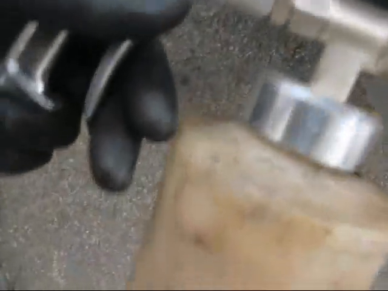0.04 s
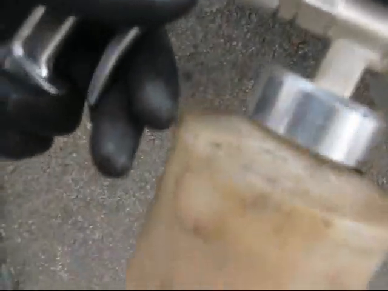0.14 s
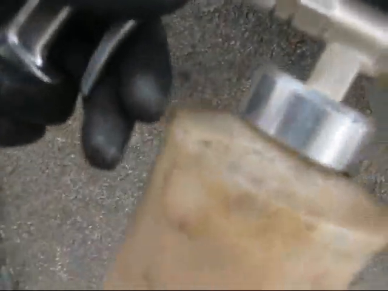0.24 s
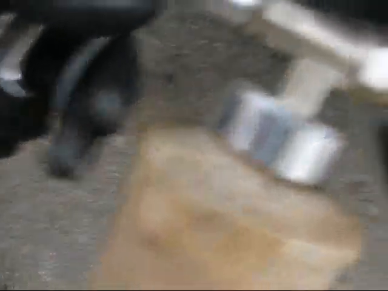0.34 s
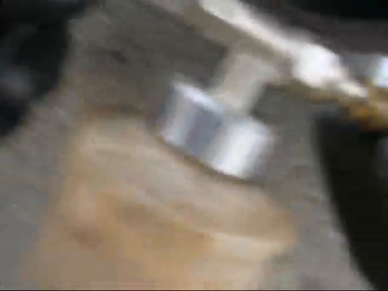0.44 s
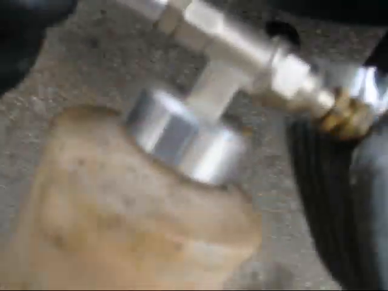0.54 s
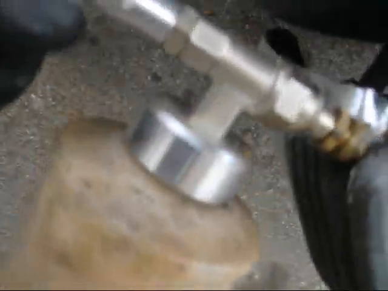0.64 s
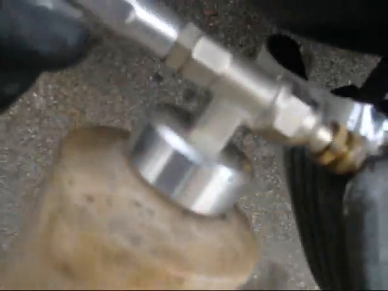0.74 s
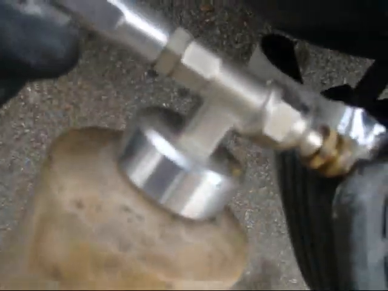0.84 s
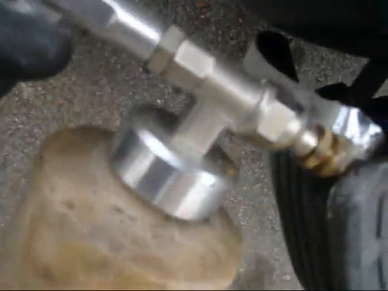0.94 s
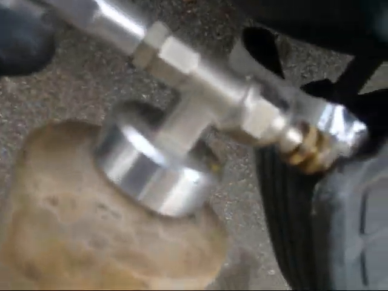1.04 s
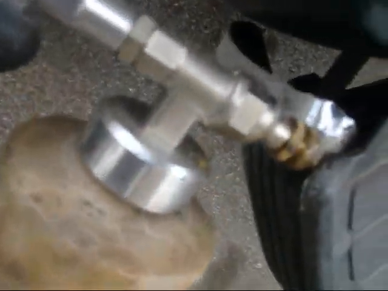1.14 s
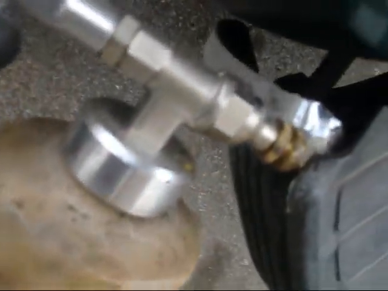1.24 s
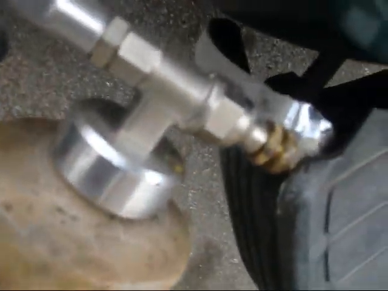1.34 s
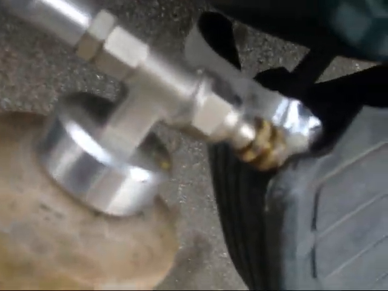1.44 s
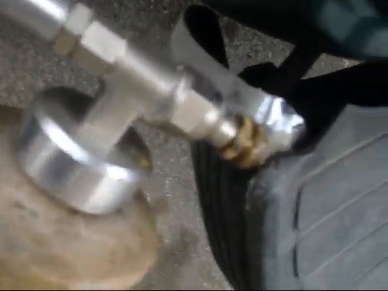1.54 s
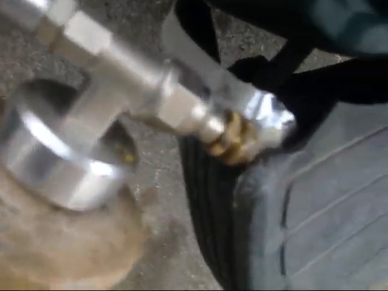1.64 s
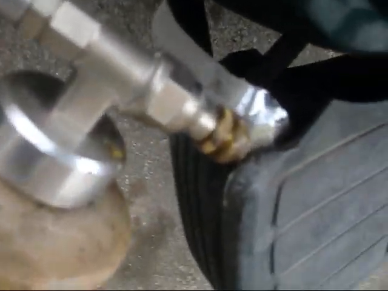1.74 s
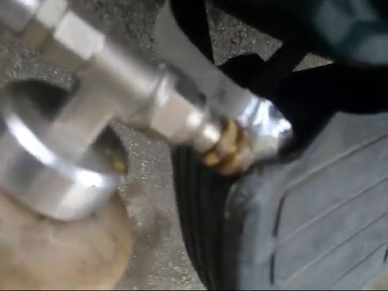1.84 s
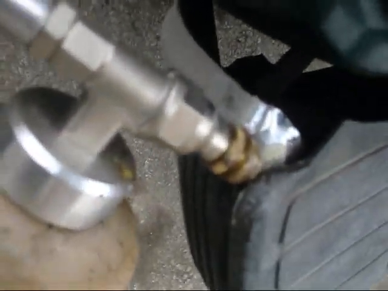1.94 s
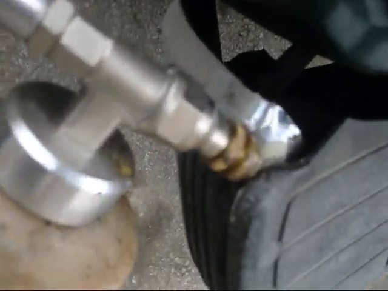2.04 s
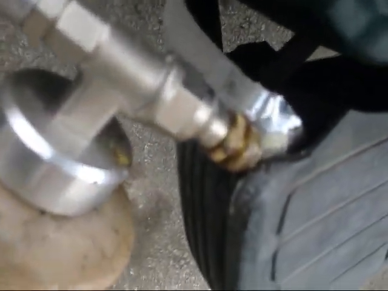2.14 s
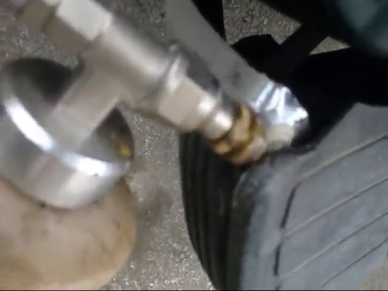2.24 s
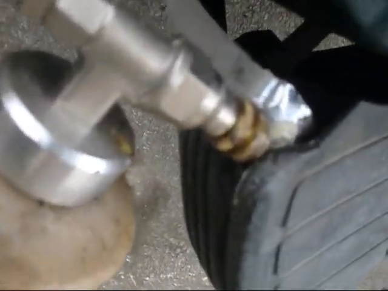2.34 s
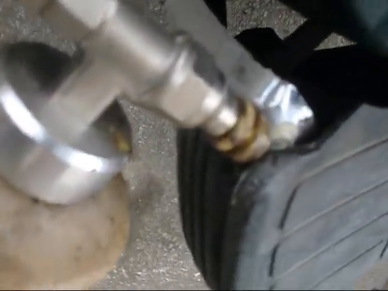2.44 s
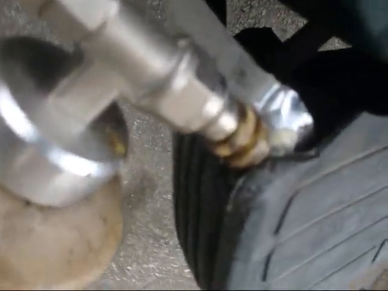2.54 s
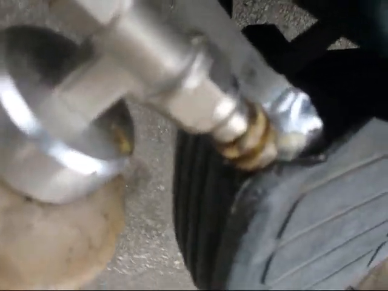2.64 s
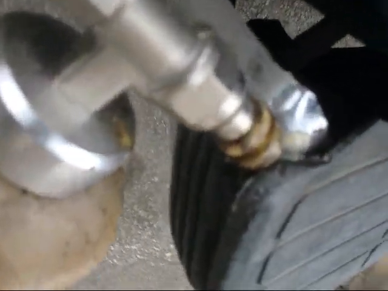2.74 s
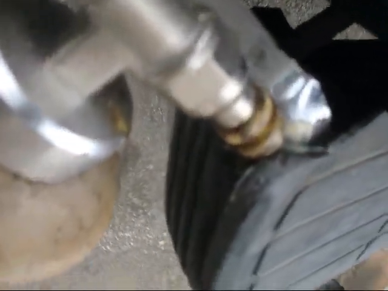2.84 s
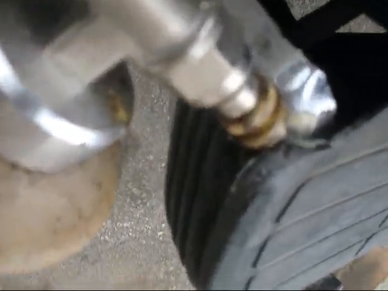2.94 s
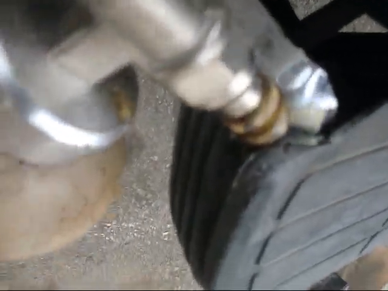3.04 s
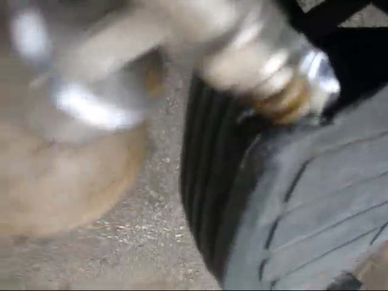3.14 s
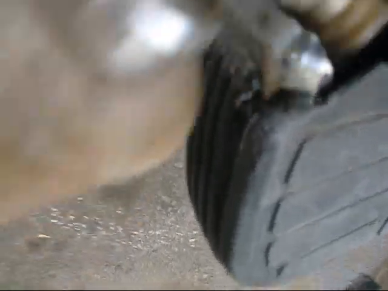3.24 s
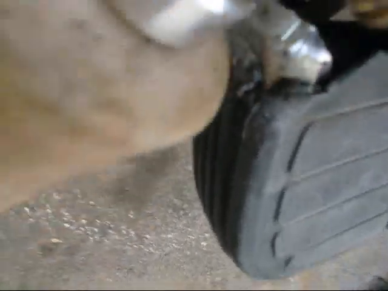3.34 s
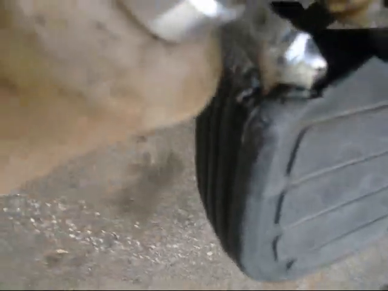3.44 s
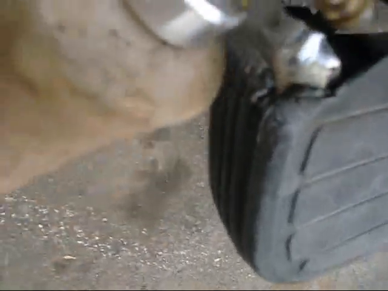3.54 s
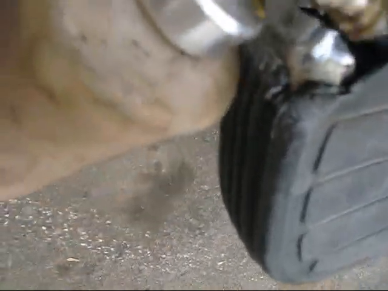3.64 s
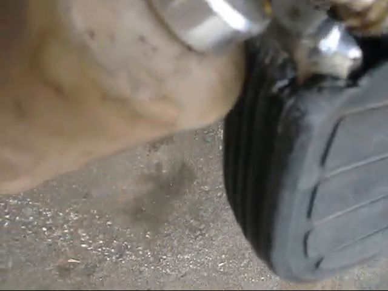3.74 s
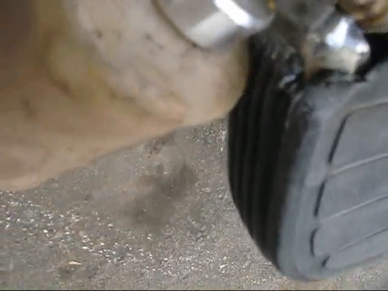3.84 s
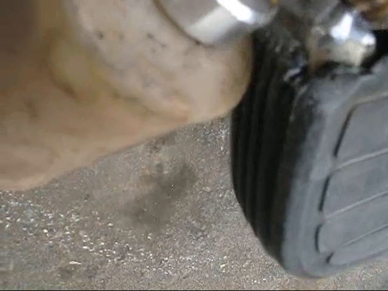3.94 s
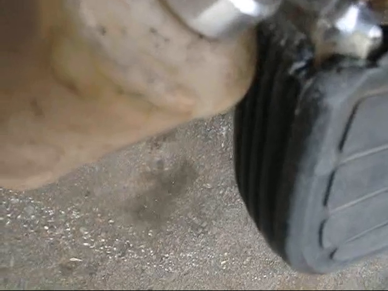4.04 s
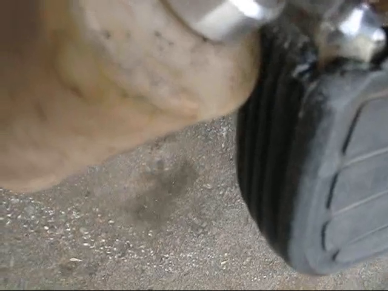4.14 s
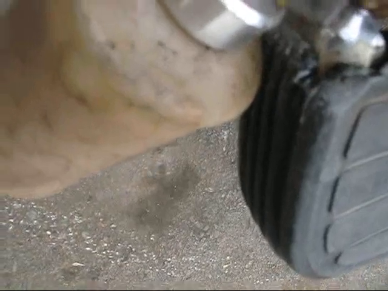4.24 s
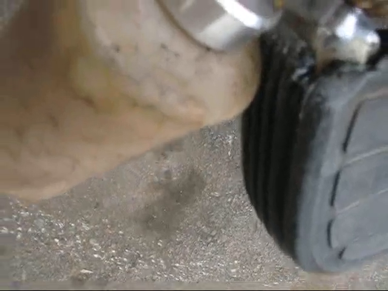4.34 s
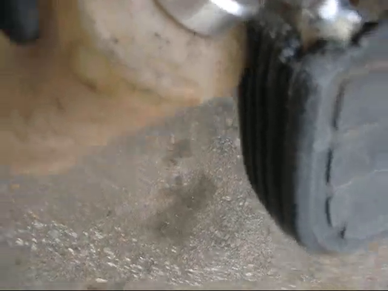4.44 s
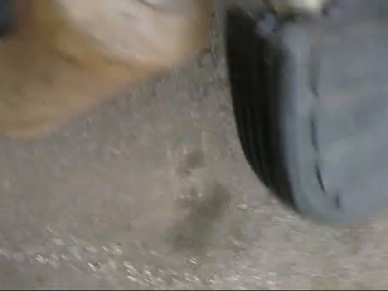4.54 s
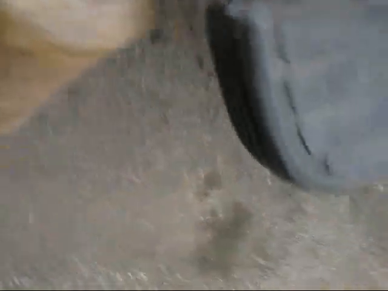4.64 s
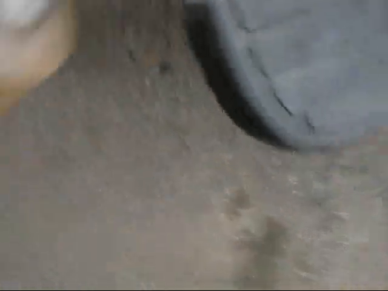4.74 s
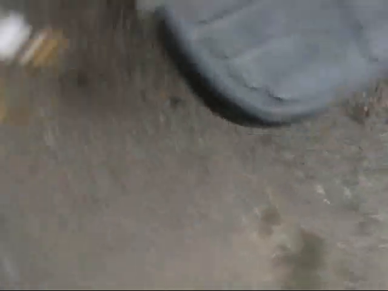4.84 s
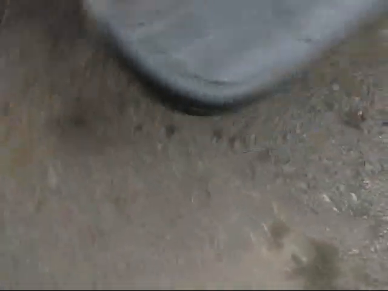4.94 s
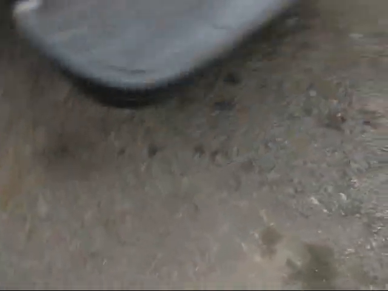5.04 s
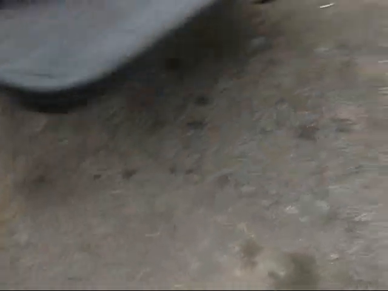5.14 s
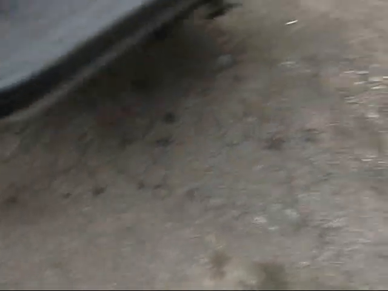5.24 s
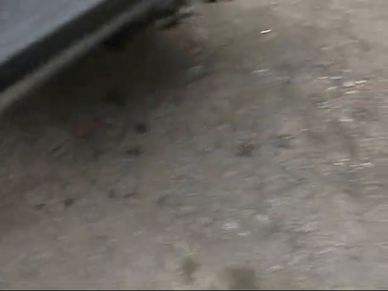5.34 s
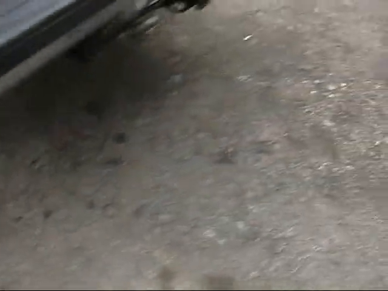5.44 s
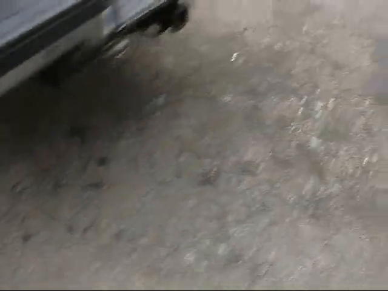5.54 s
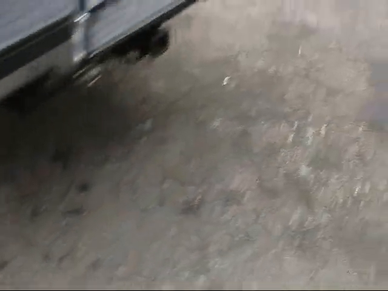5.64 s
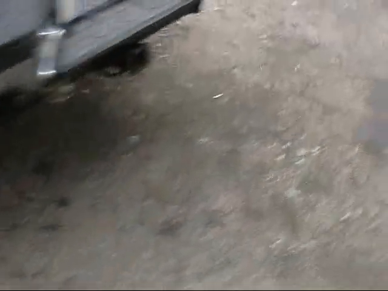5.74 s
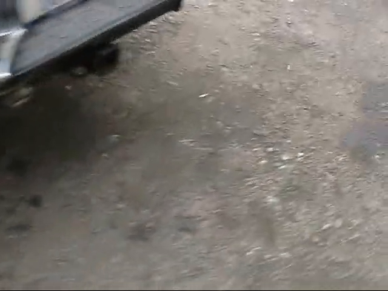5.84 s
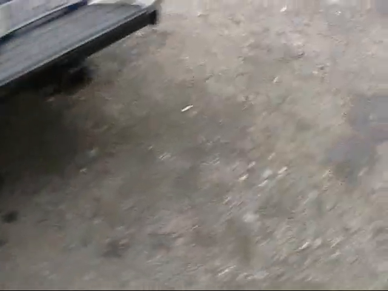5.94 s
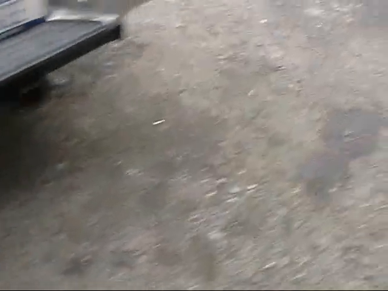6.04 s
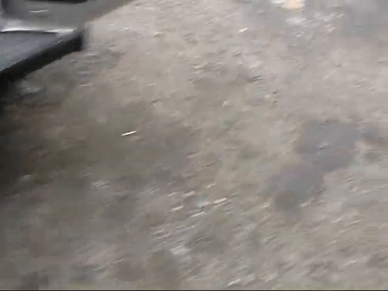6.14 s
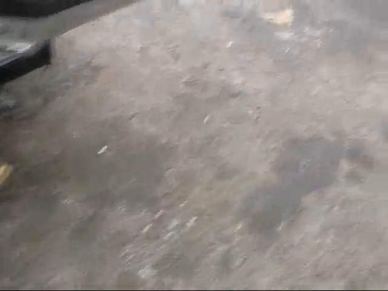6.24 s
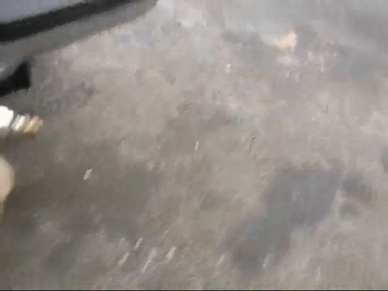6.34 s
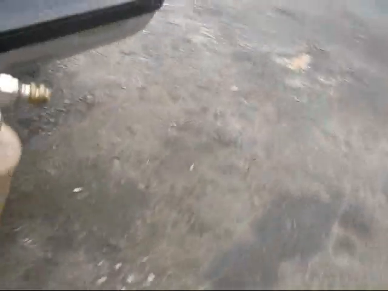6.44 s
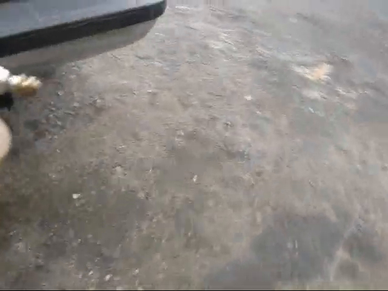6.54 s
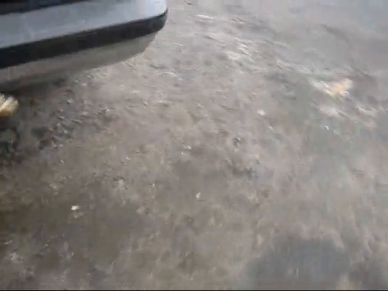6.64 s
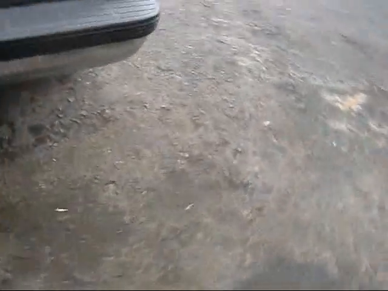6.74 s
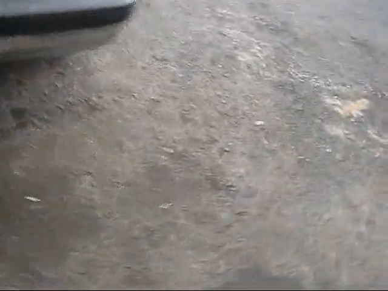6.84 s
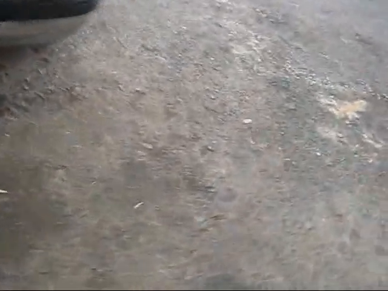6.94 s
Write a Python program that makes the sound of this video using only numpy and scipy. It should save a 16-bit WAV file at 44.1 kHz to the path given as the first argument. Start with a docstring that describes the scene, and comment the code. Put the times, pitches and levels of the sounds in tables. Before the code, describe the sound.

Thin airy leak and small rustles come first, then a very loud, dense air blast lasting about two and a half seconds. A brief gap of leaking hiss follows, then a one-second blast with a hollow, ringing colour. Each starts with a whistling puff and stops abruptly. The rest is quiet: distant rumble and whine, handling bumps, a stuttering scrape and low buffeting, caught by a slightly overloaded mono camera microphone.

```python
"""A compressed-air spray gun fires two bursts close to a hand-held mono camera: shaped turbulence noise, gated
by a valve that whistles as it opens, with low pressure puffs and a short hiss of trapped air after each shut-off.
Its coupling leaks a thin filtered-noise hiss throughout, over a yard and a distant machine's rumble, hum and whine.
Handling adds band-noise rustles, low buffeting, damped ringing knocks and a scrape made of small slips.
The microphone saturates softly and the camera's gain control ducks under the blasts."""
import sys
import numpy as np
from scipy import signal
from scipy.io import wavfile
from scipy.ndimage import uniform_filter1d

SR = 44100
rng = np.random.default_rng(int(sys.argv[2]) if len(sys.argv) > 2 else 0)


def wav_out(sig):
    """Save sig, one row per channel (or a flat mono array), as 16-bit PCM at SR to the path in sys.argv[1]."""
    wavfile.write(sys.argv[1], SR, np.round(np.clip(np.atleast_2d(sig).T, -1, 1) * 32767).astype(np.int16))


N = 308189

# leak and yard loudness as the camera moves, rms before gain control: start_s [s], leak_db [dB], yard_db [dB]
AROUND_LEVELS = [(0.0, -32.5, -47), (0.15, -27.5, -40.5), (0.56, -28, -45), (3.24, -37, -45),
                 (4.83, -39, -44), (5.54, -49, -51), (5.98, -47, -48.5), (6.35, -37, -46.5),
                 (6.65, -38, -46), (6.99, -37, -47)]


def gain_of(db):
    """Turns decibels into an amplitude factor."""
    return 10 ** (np.asarray(db) / 20)


def evened(x):
    """Scales to rms 1."""
    return x / np.sqrt(np.mean(x ** 2) + 1e-20)


def read(points, hz):
    """Reads a spectrum in dB by straight lines on a log-frequency axis."""
    f, value = np.transpose(points)
    return np.interp(np.log(hz + 1), np.log(f + 1), value)


def add(mix, s, sound):
    """Mixes a sound in at s seconds, cutting off what runs past the end."""
    part = mix[round(s * SR):][:len(sound)]
    part += sound[:len(part)]


def resonate(x, hz, width):
    """One complex-pole resonance with a gain near 1 at its peak."""
    r = np.exp(-np.pi * width / SR)
    pole = r * np.exp(2j * np.pi * hz / SR)
    return 2 * signal.lfilter([1 - r], [1, -pole], x).real


def ring(x, hz, width):
    """Two equal resonances in a row for steeper skirts, scaled to rms 1."""
    return evened(resonate(resonate(x, hz, width), hz, width))


def bump(hz, centre, octaves):
    """A bell of height 1 on the log-frequency axis."""
    return np.exp(-.5 * (np.log2((hz + 1) / centre) / octaves) ** 2)


def swell(length, hz, width, db, rise):
    """Band noise that rises and dies away; rise is the fraction of the length spent rising."""
    u = np.linspace(0, 1, round(length * SR))
    rise = np.clip(rise, .05, .9)
    shape = np.sin(.5 * np.pi * np.minimum(u / rise, (1 - u) / (1 - rise))) ** 2
    settled = ring(rng.standard_normal(len(u) + 500), hz, width)[500:]  # skips the filter's start-up
    return gain_of(db) * settled * shape


def turbulence(count, colour, patchy_db, flicker_db):
    """Noise from random short-time spectra with drifting patches and a shared flicker; colour(hz, s) gives dB."""
    frames = count // 256 + 5
    hz = np.fft.rfftfreq(1024, 1 / SR)[:, None]
    at = np.arange(frames) * 256 / SR
    real, imaginary, patches = rng.standard_normal((frames, 513, 3)).T
    patches = uniform_filter1d(patches, size=14, axis=0)  # smooth across frequency, then time
    patches = evened(uniform_filter1d(patches, size=12, axis=1))
    flicker = evened(uniform_filter1d(rng.standard_normal(frames), size=6))
    level_db = colour(hz, at) + patchy_db * patches + flicker_db * flicker
    spectra = (real + 1j * imaginary) * gain_of(level_db)
    return evened(signal.istft(spectra, nperseg=1024, noverlap=768)[1][:count])


def machine_rumble():
    """Distant machine: broad low noise plus narrow noise resonances that hum."""
    # rumble colour: pitch_hz [Hz], density_db [dB per Hz, relative]
    rumble_colour = [(12, -43), (25, -13.5), (45, -11.5), (80, -9), (110, -7.5), (162, -14), (220, -11.5),
                     (600, -23), (780, -47.5), (1320, -120)]
    # hum resonances: pitch_hz [Hz], width_hz [Hz, of each of two in a row], level_db [dB re rumble]
    hum_tones = [(65.8, 5.5, -13), (99, 4.5, -8.5), (139.7, 6.3, -9.5), (201, 13, -8)]
    rumble_db = -47.5
    low = turbulence(N, lambda hz, at: read(rumble_colour, hz), patchy_db=1.0, flicker_db=1.5)
    hum = sum(gain_of(db) * ring(rng.standard_normal(N), hz, width) for hz, width, db in hum_tones)
    return gain_of(rumble_db) * (low + hum)


def machine_whine():
    """Distant machine: a sine of wavering pitch inside a fuzz of narrow noise, swelling and fading."""
    # one tone: pitch_hz [Hz], fuzz_width_hz [Hz, of each of two resonances], fuzz [factor, rms re tone]
    whine_tone = (1430, 150, 1.2)
    # swells and fades: start_s [s], level_db [dB]
    whine_level = [(0, -46.5), (.56, -46.5), (3.3, -51), (4.72, -48), (4.8, -47), (4.93, -52), (5.0, -42),
                   (5.07, -45), (5.11, -54), (5.9, -62), (6.99, -63)]
    pitch, width, fuzz = whine_tone
    waver_hz = 18.1 * evened(uniform_filter1d(rng.standard_normal(N), size=1500))
    sine = np.sqrt(2) * np.sin(2 * np.pi * np.cumsum(pitch + waver_hz) / SR)
    tone = sine + fuzz * ring(rng.standard_normal(N), pitch, width)
    level_db = np.interp(np.arange(N) / SR, *np.transpose(whine_level))
    return gain_of(level_db) * evened(tone)


def yard_wash():
    """The yard: a mid-range wash of patchy noise whose level follows the camera."""
    # wash colour: pitch_hz [Hz], density_db [dB per Hz, relative]
    yard_colour = [(180, -30), (300, -15), (629, -7), (819, -6.5), (1150, -7), (1260, -6), (1420, -6.5),
                   (2240, -14), (2980, -12), (4200, -19), (5460, -56.5), (9240, -120)]
    wash = turbulence(N, lambda hz, at: read(yard_colour, hz), patchy_db=1.5, flicker_db=1.5)
    start_s, _, yard_db = np.transpose(AROUND_LEVELS)
    return gain_of(np.interp(np.arange(N) / SR, start_s, yard_db)) * wash


def coupling_leak():
    """Thin hiss of air through a small gap; its colour depends on where the camera stands."""
    # three leak colours, each: pitch_hz [Hz], density_db [dB per Hz, relative]
    close_by = [(1290, -28), (2200, -15), (2980, -10), (3560, -13.5), (3960, -10), (4370, -13.5),
                (5190, -10.5), (7250, -11.5), (8400, -6), (10600, -2.5), (12400, -3.5), (14600, -16),
                (15500, -23)]
    behind_bumper = [(1290, -54), (2200, -23.5), (2630, -5), (3100, -6), (3420, -21), (4160, -11),
                     (5100, -7.5), (7250, -9.5), (7490, -8), (9190, -7.5), (10100, -2.5), (11100, -3),
                     (15500, -15.5)]
    step_away = [(1290, -42.5), (2200, -20.5), (2930, -6.5), (3150, -6), (3500, -16.5), (5060, -7),
                 (6360, -13), (7800, -6), (9420, -7.5), (10300, 0), (10900, -0.5), (14800, -12),
                 (15500, -18)]
    step_back_s, swing_s, swing_length_s = 2.3, 5.44, 0.67  # drops behind the bumper, later swings round
    echo_s, echo_drift, echo_db = .00095, -.00018, 0.3  # delay off the bumper, its drift in s per s, comb depth

    def colour(hz, at):
        """The leak's spectrum at the camera, combed by the bumper's reflection while close."""
        turned = np.clip((at - swing_s) / swing_length_s, 0, 1)
        later = (1 - turned) * read(behind_bumper, hz) + turned * read(step_away, hz)
        comb = echo_db * np.cos(2 * np.pi * hz * (echo_s + echo_drift * at))
        return np.where(at < step_back_s, read(close_by, hz) + comb, later)

    hiss = turbulence(N, colour, patchy_db=1.2, flicker_db=1.0)
    start_s, leak_db, _ = np.transpose(AROUND_LEVELS)
    return gain_of(np.interp(np.arange(N) / SR, start_s, leak_db)) * hiss


def add_rustles_and_buffeting(mix):
    """Rustles and rubbing, short swells of band noise, plus longer low buffeting as the camera swings."""
    # start_s [s], length_s [s], pitch_hz [Hz], width_hz [Hz, of each of two resonances], level_db [dB];
    # the long rows below 100 Hz are the buffeting
    noise_swells = [(0.113, 0.049, 2500, 2500, -40), (.265, 0.046, 3000, 3500, -35.5),
                    (4.6, 0.3, 1900, 300, -41.5), (4.679, 0.19, 2700, 900, -40),
                    (4.739, 0.013, 3500, 2500, -31), (4.753, 0.03, 3380, 900, -28.5),
                    (4.746, 0.033, 7000, 6000, -30.5), (5.191, .05, 1800, 2000, -46),
                    (6.418, .05, 1100, 1200, -41.5), (6.098, 0.85, 60, 90, -48), (6.7, 0.33, 85, 40, -45)]
    for start_s, *settings in noise_swells:
        add(mix, start_s, swell(*settings, rise=0.23))


def knock(db, hz):
    """A struck body: a damped sine roughened by ringing noise, with a brief noise tick on top."""
    t60_s, t60_hz, damping = 0.047, 300, 0.52  # decay at t60_hz; higher knocks die sooner
    tick_db, tick_t60_s, attack_s = -8.5, 0.014, 0.00098
    t = np.arange(0, .08, 1 / SR)
    rough, click = rng.standard_normal((len(t), 2)).T
    tone = np.sin(2 * np.pi * hz * t) + 0.48 * ring(rough, hz * 1.7, hz * 1.3)
    decay = gain_of(-60 * t / t60_s * (hz / t60_hz) ** damping)
    tick = ring(click, 900 + hz, 2500) * gain_of(tick_db - 60 * t / tick_t60_s)
    return gain_of(db) * (tone * decay + tick) * np.minimum(t / attack_s, 1)


def add_knocks(mix):
    """Handling knocks on the gun and camera body."""
    # start_s [s], level_db [dB, the sine's peak before decay], pitch_hz [Hz]
    knocks = [(4.665, -15, 1220), (5.127, -31, 797), (5.133, -33, 240), (5.194, -29, 190),
              (5.207, -31, 500), (5.444, -30.5, 299.6), (5.746, -32, 1500), (5.817, -16, 1390),
              (5.82, -23, 404), (6.421, -24, 249), (6.44, -30, 150.3), (6.487, -26, 345), (6.5, -31, 280),
              (6.605, -34, 382), (6.921, -34, 120), (6.935, -31, 596), (6.984, -26.5, 334)]
    for start_s, db, hz in knocks:
        add(mix, start_s, knock(db, hz))


def scrape():
    """Stick-slip: brief rough jolts ring the body, over rubbing noise that builds and trails off."""
    # body resonances: pitch_hz [Hz], width_hz [Hz, of each of two in a row], level_db [dB, relative]
    body_modes = [(300, 180, -3), (620, 660, -1.5), (1130, 340, -0.5), (1630, 330, 0.5), (2820, 600, -10)]
    length_s, scrape_db, slip_count = .068, -35, 15
    quicken, growth_db, scatter_db, jitter_s = 0.83, 11, 0.5, .001  # slips crowd together and grow to the end
    rub_hz, rub_width_hz, rub_db, rub_tail_s = 1200, 2500, -35, 0.079
    u = np.linspace(0, 1, slip_count)
    noise = rng.standard_normal((slip_count, 122))
    starts = length_s * u ** quicken + jitter_s * abs(noise[:, 1])
    levels_db = growth_db * u ** 2 + scatter_db * noise[:, 0]
    jolts = np.zeros(round(.2 * SR))
    for start_s, level_db, grit in zip(starts, levels_db, noise[:, 2:]):
        fade_db = np.arange(120) * 0.26  # 0.26 dB per sample
        add(jolts, start_s, gain_of(level_db - fade_db) * grit)
    sound = sum(gain_of(db) * ring(jolts, hz, width) for hz, width, db in body_modes)
    sound = gain_of(scrape_db) * evened(sound)
    rub_s = length_s + rub_tail_s
    add(sound, 0, swell(rub_s, rub_hz, rub_width_hz, rub_db, rise=length_s / rub_s))
    return sound


def add_puffs(mix):
    """Pressure puffs at the valve: short low thumps of band noise, wider at higher pitch."""
    # start_s [s], pitch_hz [Hz], level_db [dB]
    puffs = [(.609, 60, -13), (3.167, 30, -15), (3.468, 30, -11), (3.471, 149.7, -8), (4.499, 170, -8),
             (4.502, 25, -18)]
    for start_s, hz, db in puffs:
        add(mix, start_s, swell(0.031, hz, 60 + 0.85 * hz, db, rise=.4))


def burst(aim, jet_spectrum, modes, valve):
    """Jet noise gated by the valve, which whistles as it opens; trapped air hisses out after it shuts."""
    # last air leaving the gun: pitch_hz [Hz], density_db [dB per Hz, relative]
    trapped_colour = [(59, -38), (100, -7), (998, -8), (1840, -5), (4660, 0), (6810, -7), (12600, -2),
                      (15500, -2.5)]
    # valve seat cracking open: pitch_hz [Hz], width_hz [Hz, of each of two resonances], level_db [dB re whistle]
    whistle_tones = [(4800, 1900, 2), (10750, 1400, -0.5)]
    rise_db_per_s, fall_db_per_s = 2800, 2200
    trapped_db, trapped_fade_db_per_s, emptied_db_per_s = -13, 315, 1200  # level re jet; emptying adds to the fade
    treble_db, treble_dip_db, treble_s = 3.5, -8.5, 0.59  # the top treble creeps up through the burst
    whistle_lead_s, whistle_rise = .009, 0.35
    s, level_db, roar_db, hollow_db, peak_hz = np.transpose(aim)
    opens, shuts, whistle_s, whistle_db, empty_s = valve
    start = opens - .03
    t = np.arange(start, shuts + 0.13, 1 / SR)

    def colour(hz, at):
        """Spectrum, resonances and the slow changes of aim, in dB."""
        now = at + start
        roar, hollow, peak = (np.interp(now, s, column) for column in (roar_db, hollow_db, peak_hz))
        since_open = np.maximum(now - opens, 0)
        fizz = treble_db + treble_dip_db * np.exp(-since_open / treble_s)
        # the nozzle peak slides around its mean place
        moved = hz * (1 + bump(hz, 10020, 0.404) * (peak.mean() / peak - 1))
        lift = sum(db * np.exp(-2 * ((hz - f) / width) ** 2) for f, width, db in modes)
        aimed = roar * bump(hz, 400, 1.85) + hollow * bump(hz, 3600, 0.85)
        return read(jet_spectrum, moved) + lift + aimed + fizz * bump(hz, 15600, 0.25)

    jet = turbulence(len(t), colour, patchy_db=0.58, flicker_db=0.32)
    trapped = turbulence(len(t), lambda hz, at: read(trapped_colour, hz), patchy_db=1.0, flicker_db=3.5)
    after = np.maximum(t - shuts, 0)
    gate_db = -rise_db_per_s * np.maximum(opens - t, 0) - fall_db_per_s * after
    emptied = np.maximum(after - empty_s, 0)
    fade_db = trapped_db - trapped_fade_db_per_s * after - emptied_db_per_s * emptied
    air = gain_of(gate_db) * jet + (t > shuts - .01) * gain_of(fade_db) * trapped
    out = gain_of(np.interp(t, s, level_db)) * air
    for hz, width, db in whistle_tones:
        whistle = swell(whistle_s, hz, width, whistle_db + db, whistle_rise)
        add(out, opens - start - whistle_lead_s, whistle)
    return start, out


def add_bursts(mix):
    """The spray gun's two bursts: one jet against a flat part, one into a hollow."""
    # one table a burst as the aim drifts: start_s [s], level_db [dB before gain control],
    # roar_db [dB lift around 400 Hz, jet striking a surface], hollow_db [dB lift around 3600 Hz, hollow ringing],
    # peak_hz [Hz, nozzle peak; its drift about its mean counts]
    aims = [
        [(.585, -6, -12.5, 3, 10600), (.61, 2.5, 4, -0.5, 10800), (.66, 3, 0, 1.5, 10500), (1., 3, 0, 0, 9800),
         (2.5, 3, 0, 0, 9560), (3.18, 0.5, 0.7, 3, 9500)],
        [(3.48, 4, 1, -3, 10100), (3.52, 1.8, -2.5, 2, 10200), (3.58, -0.1, 5, 3.5, 9800),
         (3.65, -1.5, 0.8, 3.5, 9970), (3.98, -0.6, 0.5, 0.5, 10330), (4.45, -0.3, 1.5, 1.1, 10200),
         (4.51, 1.5, 1, -1.2, 10500)],
    ]
    # per burst: opens_s [s], shuts_s [s], whistle_length_s [s], whistle_db [dB], empty_s [s after shutting]
    valves = [(.583, 3.188, 0.059, -4.5, 0.038), (3.473, 4.516, 0.034, -8.5, 0.07)]
    # jet colours: pitch_hz [Hz], density_db [dB per Hz, relative]
    flat_jet = [(15, -52), (25, -30.5), (104, -3), (331, -0.5), (1050, 0), (4750, -6), (7100, -5),
                (9810, 0), (14300, -15), (15500, -18.5)]
    hollow_jet = [(15, -52), (25, -23.5), (482, -7), (552, -9.5), (631, -5), (2120, -8.5), (3630, -0.5),
                  (6550, -10.5), (10600, -7), (13900, -16.5), (15500, -46)]
    # resonances on top: pitch_hz [Hz], width_hz [Hz, two standard deviations], lift_db [dB]
    flat_modes = [(2980, 430, 1), (8240, 1200, 0.5), (10350, 900, 1.5), (14850, 900, -0.5)]
    hollow_modes = [(610, 67, 2.5), (1680, 520, 3.), (2980, 280, 3), (3290, 190, 1), (5430, 610, 3),
                    (10950, 1600, 3)]
    for settings in zip(aims, (flat_jet, hollow_jet), (flat_modes, hollow_modes), valves):
        add(mix, *burst(*settings))


def scene():
    """Layers every source from the background forward, the same in both channels."""
    mix = machine_rumble() + machine_whine() + yard_wash() + coupling_leak()
    add_rustles_and_buffeting(mix)
    add_knocks(mix)
    add(mix, 5.752, scrape())
    add_puffs(mix)
    add_bursts(mix)
    return np.array([mix, mix])


def record(dry):
    """The microphone saturates, gain control ducks fast and recovers slowly, full scale clips; then a band limit."""
    overload_db, edge_hz = 10, 15440
    duck_from_db, duck_most_db, duck_attack_s, recover_db_per_s = -27, 14, 0.013, 4
    sensed = gain_of(overload_db) * np.tanh(dry / gain_of(overload_db))
    power = signal.lfilter(np.ones(400) / 400, 1, sensed[0] ** 2)
    power_db = 10 * np.log10(power + 1e-12)
    # a running maximum against a rising ramp holds each duck, then lets it go at a steady rate
    recover = np.arange(N) * recover_db_per_s / SR
    over_db = np.clip(power_db - duck_from_db, 0, duck_most_db)
    wanted_db = np.maximum.accumulate(over_db + recover) - recover
    r = np.exp(-1 / (duck_attack_s * SR))
    ducked = sensed / gain_of(signal.lfilter([1 - r], [1, -r], wanted_db))
    low_pass = signal.firwin(1023, edge_hz, window=("kaiser", 12), fs=SR)
    return signal.oaconvolve(np.clip(ducked, -1, 1), low_pass[None], "same")


dry = scene()
out = record(dry)
wav_out(out)
```